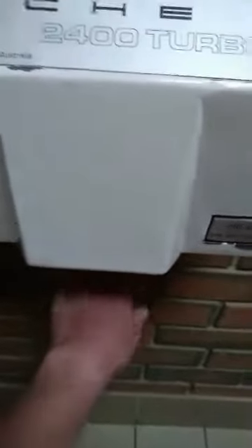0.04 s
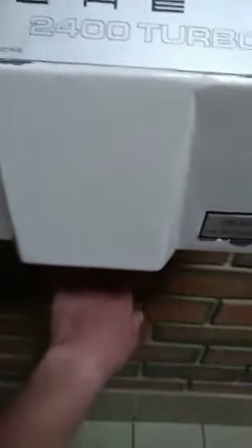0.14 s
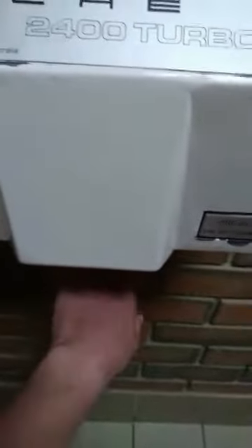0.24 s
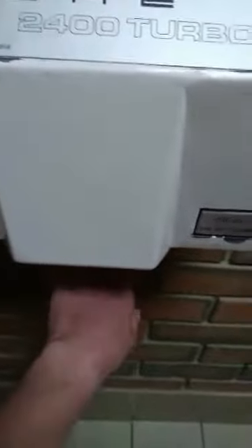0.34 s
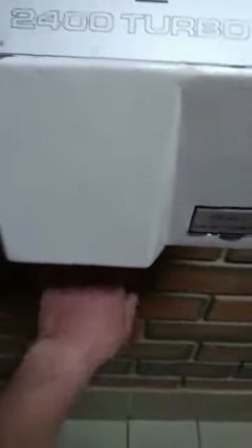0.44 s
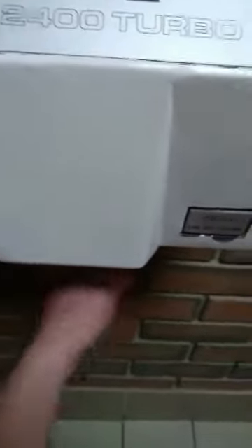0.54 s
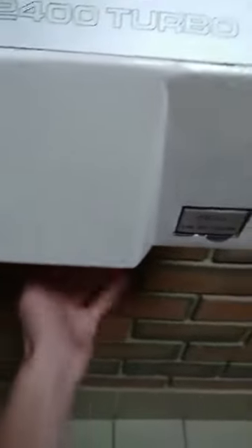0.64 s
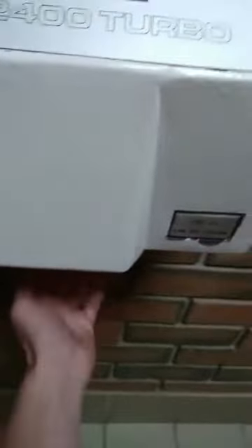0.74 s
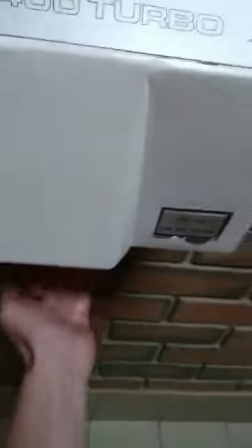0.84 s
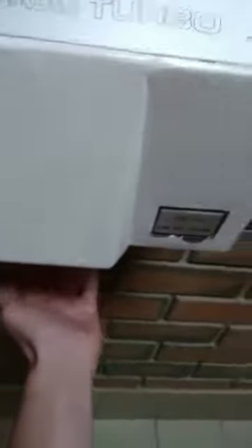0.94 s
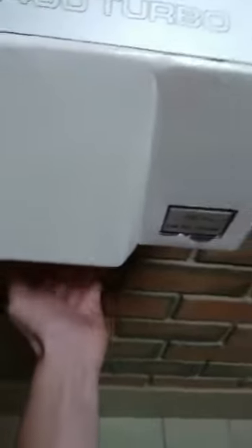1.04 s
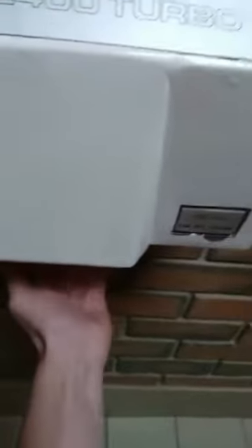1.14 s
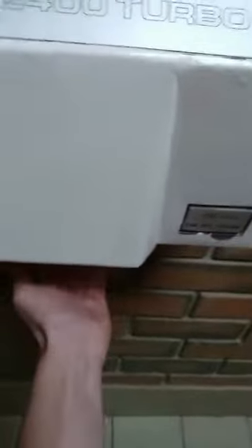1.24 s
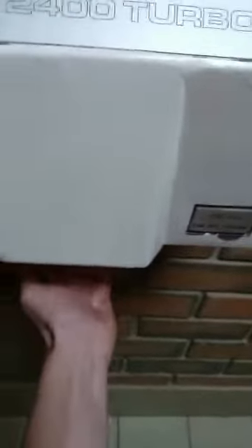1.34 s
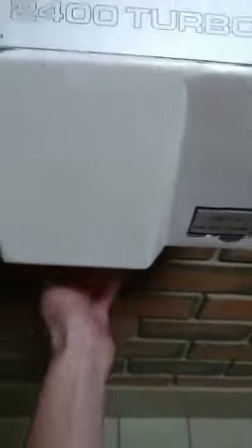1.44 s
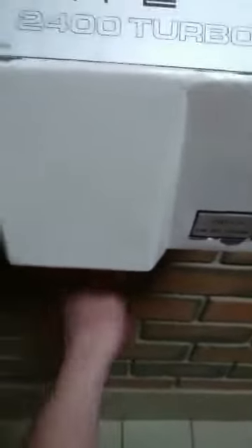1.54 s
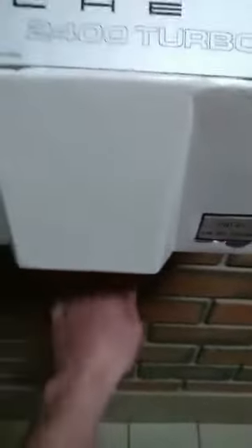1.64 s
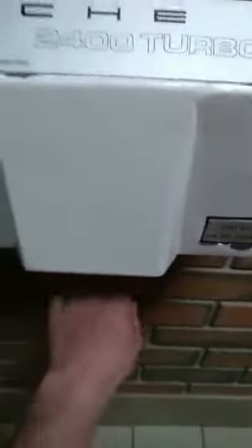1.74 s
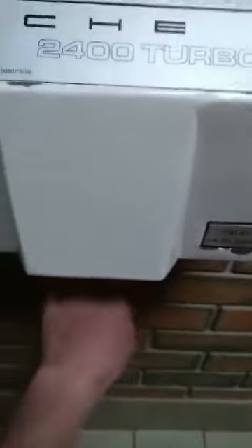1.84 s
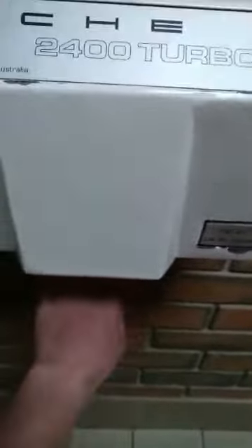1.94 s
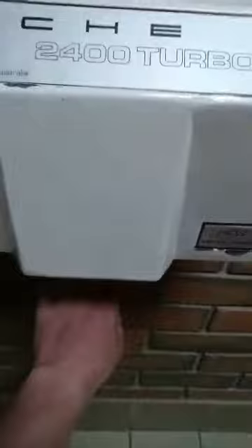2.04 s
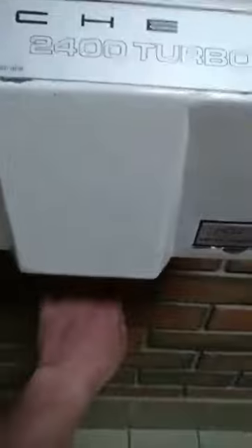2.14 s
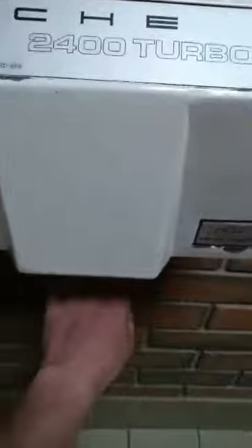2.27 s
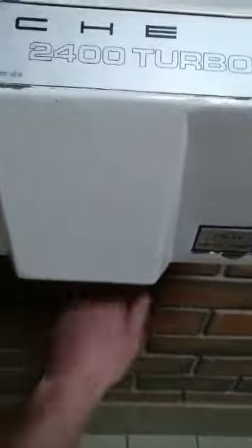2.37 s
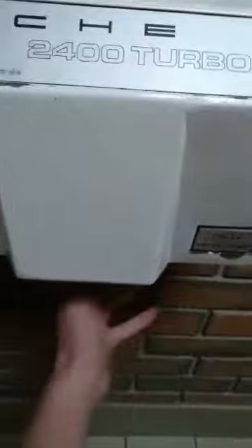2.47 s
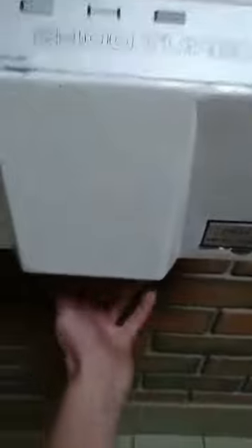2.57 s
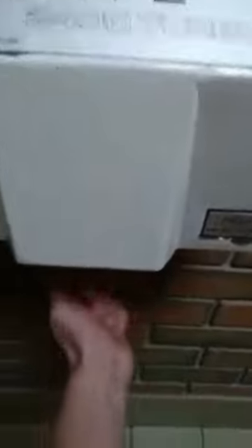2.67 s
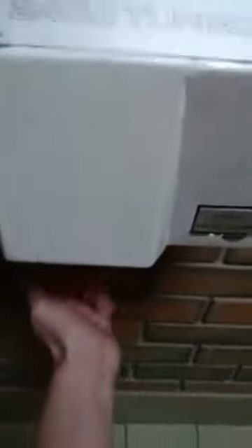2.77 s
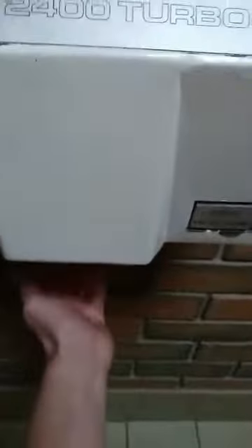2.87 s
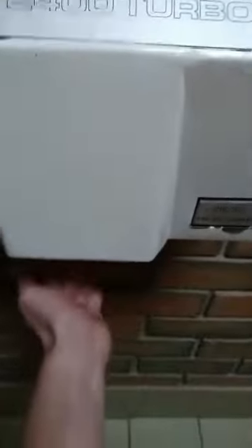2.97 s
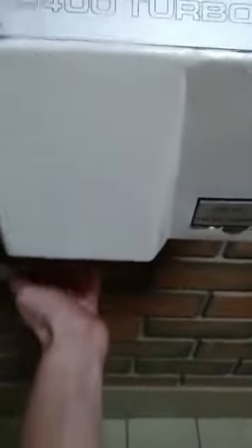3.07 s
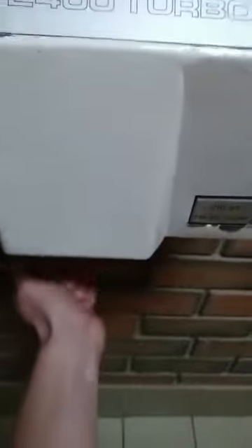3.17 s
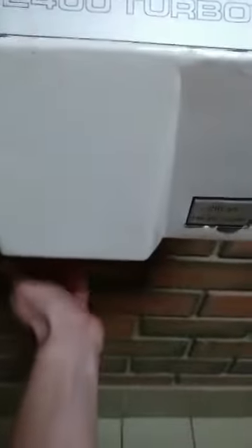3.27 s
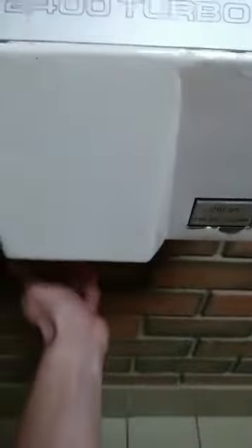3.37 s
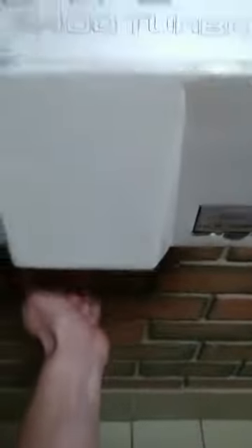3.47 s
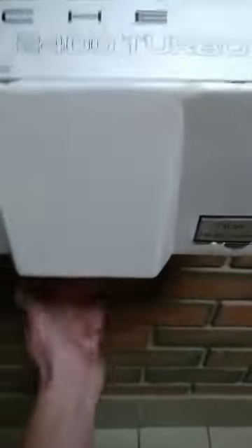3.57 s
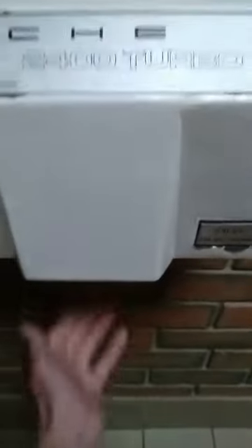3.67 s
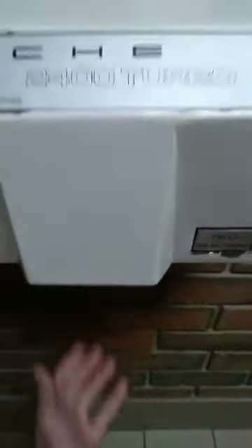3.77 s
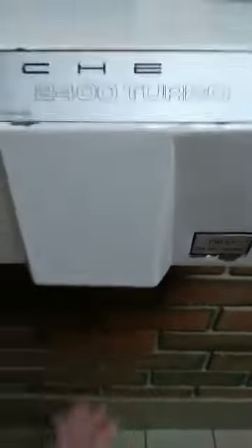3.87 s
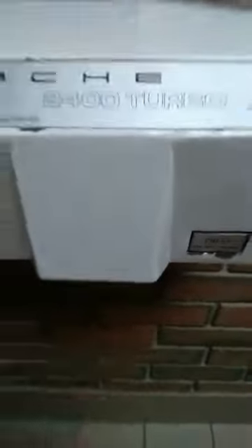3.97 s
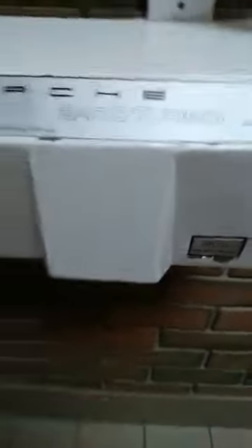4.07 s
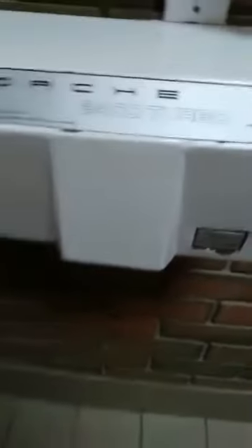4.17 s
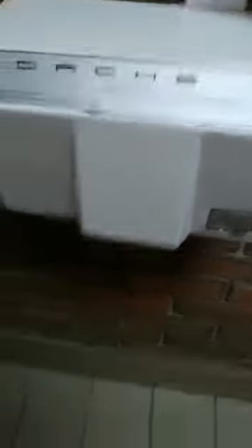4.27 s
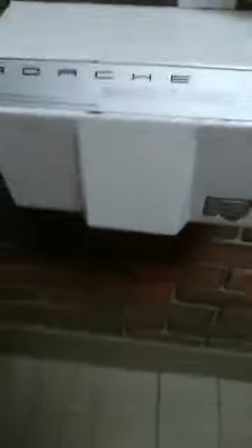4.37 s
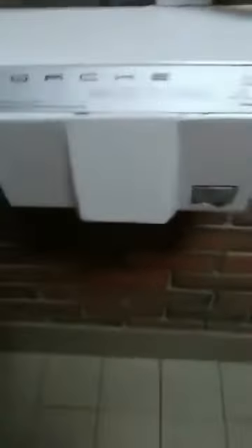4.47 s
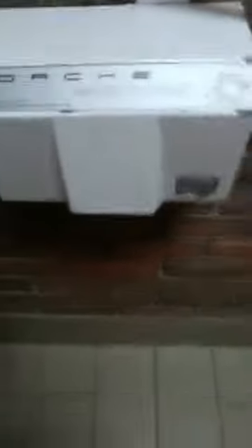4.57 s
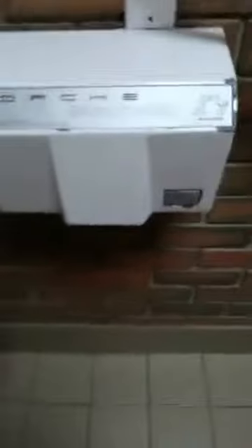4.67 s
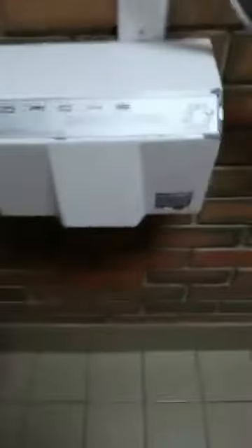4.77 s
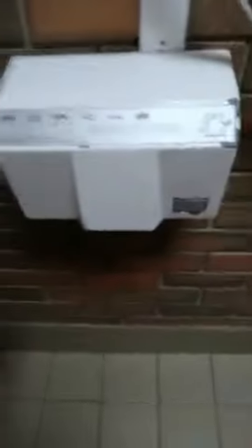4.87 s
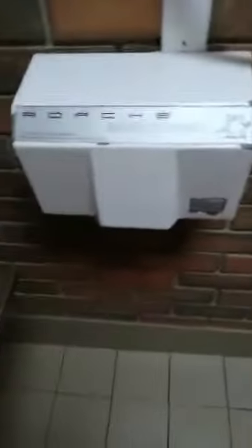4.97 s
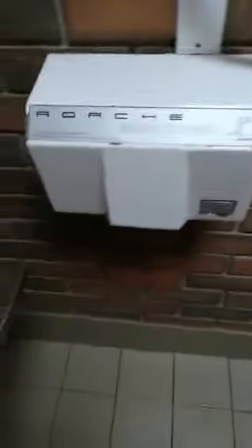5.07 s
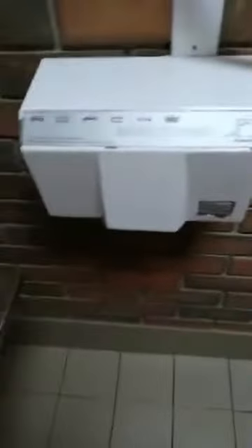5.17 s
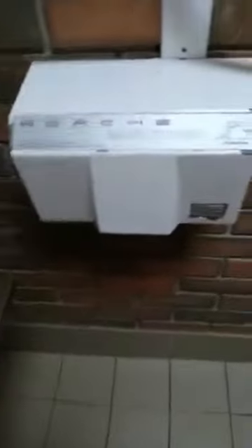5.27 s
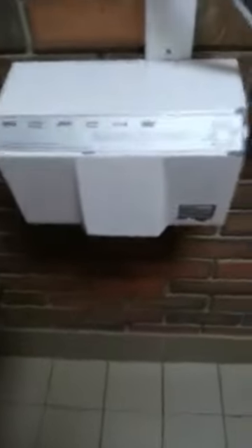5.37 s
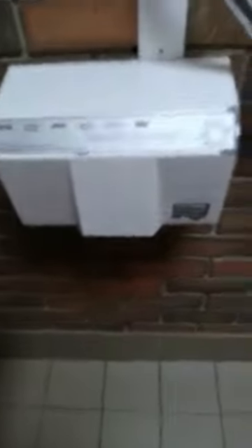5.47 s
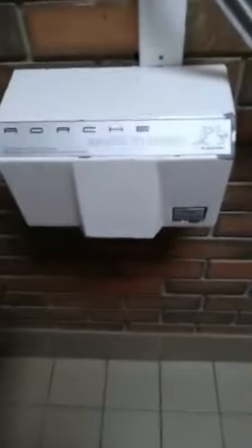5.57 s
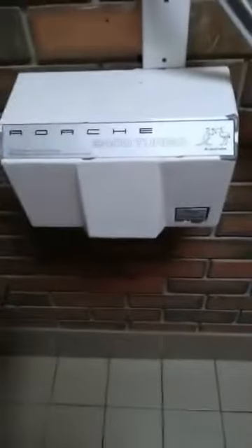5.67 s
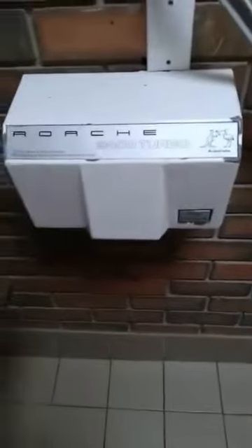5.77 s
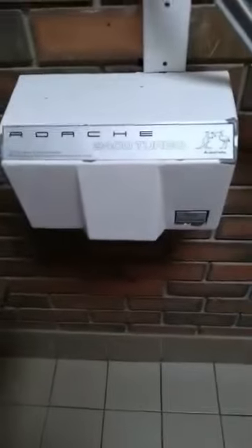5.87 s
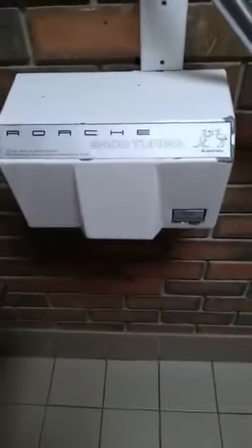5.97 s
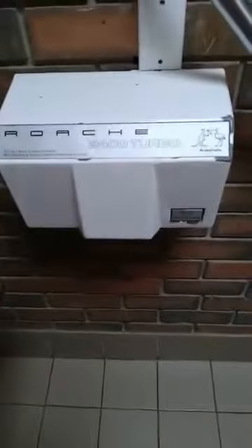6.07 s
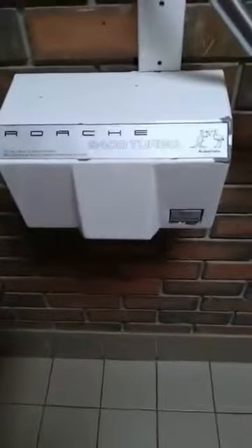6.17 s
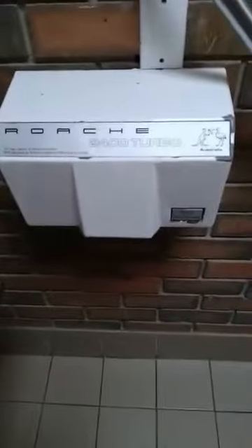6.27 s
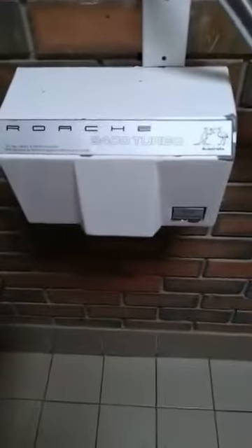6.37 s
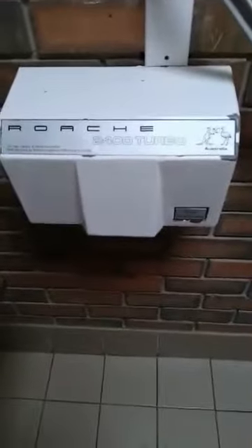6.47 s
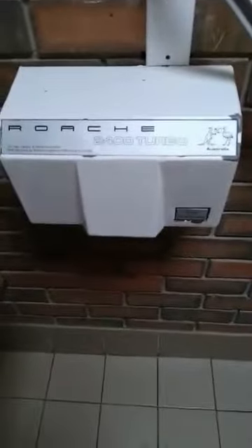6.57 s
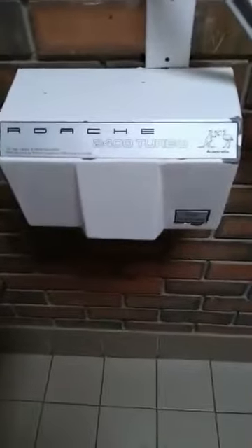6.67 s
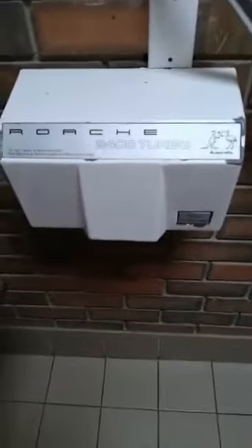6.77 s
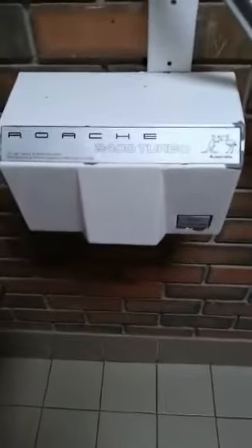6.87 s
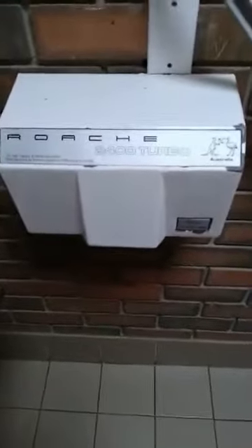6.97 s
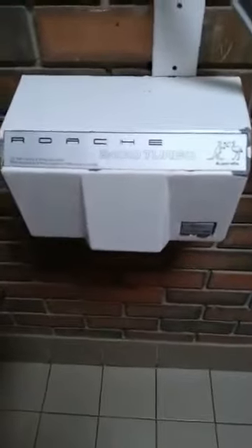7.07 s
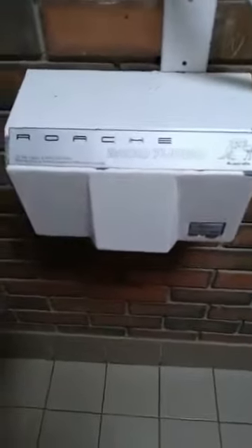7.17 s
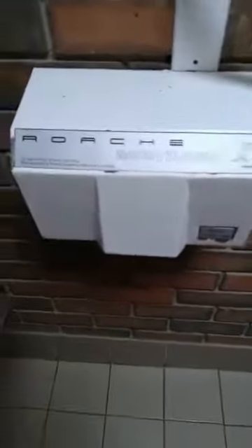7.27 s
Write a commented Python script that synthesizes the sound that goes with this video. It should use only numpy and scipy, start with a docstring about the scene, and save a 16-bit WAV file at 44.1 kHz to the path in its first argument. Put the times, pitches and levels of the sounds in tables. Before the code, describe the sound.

A wall-mounted electric hand dryer roars close up with a steady low motor drone, then clacks off and winds down to quiet.

```python
"""Hand dryer in a tiled toilet

A wall-mounted dryer heard close up: a six-blade fan, a gliding sine, drones over a rush of shaped noise.
Shaft-locked motor lines, mains hum, ringing booms and hoots thicken it; the jet hisses over a hand.
The timer clacks off in noise bursts and ringing sheet metal, and the fan coasts down in pitch and level.
A low room rumble stays, with a few soft noise scuffs, knocks and thuds."""
import sys
import numpy as np
from scipy import signal
from scipy.fft import rfft, irfft
from scipy.io import wavfile
from scipy.ndimage import uniform_filter1d

SR = 44100
rng = np.random.default_rng(int(sys.argv[2]) if len(sys.argv) > 2 else 0)


def master(y):
    """Save y as 16-bit WAV."""
    cut = np.clip(np.atleast_2d(y).T, -1, 1)
    pcm = np.round(cut * 32767)  # scale
    wavfile.write(sys.argv[1], SR, pcm.astype(np.int16))


N = 322798
TIME = np.arange(N) / SR


def gain_of(db):
    """Decibels to amplitude."""
    return 10 ** (np.asarray(db) / 20)


def evened(x):
    """Scales to rms 1."""
    return x / np.sqrt(np.mean(x ** 2) + 1e-20)


def read(points, hz):
    """Reads a spectrum table on a log-frequency axis."""
    f, value = np.transpose(points)
    return np.interp(np.log(hz + 1), np.log(f + 1), value)


def add(mix, s, sound):
    """Lays a stereo sound into the mix at time s."""
    part = mix[:, round(s * SR):][:, :sound.shape[1]]
    part += sound[:, :part.shape[1]]


def panned(db):
    """Left and right gains for a left-minus-right level difference, with mean 1."""
    pair = np.array([gain_of(db / 2), gain_of(-db / 2)])
    return pair / pair.mean(0)


def coloured(x, points):
    """Filters by a spectrum table."""
    size = x.shape[-1]
    hz = np.fft.rfftfreq(size, 1 / SR)
    return irfft(rfft(x) * gain_of(read(points, hz)), size)


def wander(hz, channels=1):
    """Slow random drift of rms 1, up to about hz."""
    f = np.fft.rfftfreq(N, 1 / SR)
    spectrum = rfft(rng.standard_normal((channels, N)))
    return evened(irfft(spectrum / (1 + (f / hz) ** 4), N))


def patches(shape, frame_count, bin_count):
    """Random blotches of rms 1 over time and frequency."""
    over_time = uniform_filter1d(rng.standard_normal(shape), frame_count, 0)
    return evened(uniform_filter1d(over_time, bin_count, 1))


def held(start, end, ramp):
    """1 between start and end, with sloping sides."""
    return np.clip(np.minimum(TIME - start, end - TIME) / ramp + .5, 0, 1)


def lifts_db(resonances, hz):
    """Summed lift of a table of resonances at hz."""
    return sum(db / (1 + (2 * (hz - f) / width) ** 2) for f, width, db in resonances)


# likeness of the two ears: f/Hz, likeness (0 to 1)
EAR_LIKENESS = [(60, 0.93), (130, 1), (270, 0.72), (570, .45), (1200, 0.066), (2500, 0.0048), (5000, 0)]
# stereo tilt: f/Hz, left minus right level/dB
NOISE_LEAN = [(60, 6), (120, -2), (240, 2.5), (400, 1.5), (1100, 0), (2000, 3), (3500, -0.5), (9000, 4.5)]


def noise(field_db, size=4096):
    """Stereo noise of rms 1 under a dB field(t, Hz); the ears share the bass but not the treble."""
    hop = size // 4
    hz = np.fft.rfftfreq(size, 1 / SR)
    t = np.arange(N // hop + 3)[:, None] * hop / SR
    shape = (2, len(t), len(hz))
    a, b = rng.standard_normal(shape) + 1j * rng.standard_normal(shape)
    same = np.clip(read(EAR_LIKENESS, hz), -1, 1)
    z = np.array([a, same * a + np.sqrt(1 - same ** 2) * b])
    z *= panned(read(NOISE_LEAN, hz))[:, None]
    z *= gain_of(field_db(t, hz))
    sound = signal.istft(z.swapaxes(1, 2), nperseg=size, noverlap=size - hop)[1]
    return evened(sound[:, :N])


# decay of the tiled room: f/Hz, t60/s
TILE_DECAY = [(200, 0.94), (2000, 0.49), (6000, 0.41), (11000, 0.3)]


def room(x):
    """Dense echoes off the tiles, the treble dying first."""
    hz, t, z = signal.stft(rng.standard_normal((2, SR)), SR, nperseg=256)
    decay = gain_of(-60 * t / read(TILE_DECAY, hz)[:, None])
    tail = signal.istft(z * decay, SR, nperseg=256)[1]
    return signal.fftconvolve(x, tail / np.linalg.norm(tail[0]), axes=1)[:, :N]


STEP_BACK = (3.65, 4.28)  # the listener backs away: start t/s, end t/s


def stepped(t, near, back):
    """Blends a value as the listener backs away from the nozzle."""
    return near + (back - near) * np.interp(t, STEP_BACK, [0, 1])


BLADES = 6
RUN_HZ, OFF_S = 284.9, 5.86  # blade-passing pitch at full speed, and the moment the power is cut
COAST_S = .37  # drag slows the fan as 1 / sqrt(1 + time / COAST_S)


def blade_hz(t):
    """Blade pitch: steady under power, then braked by drag."""
    return RUN_HZ / np.sqrt(1 + np.maximum(t - OFF_S, 0) / COAST_S)


def slowed(t):
    """Octaves of speed lost since the power was cut."""
    return np.log2(RUN_HZ / blade_hz(t))


DROP_S, DROP_FADE_S = 6.77, .08  # the sound drops away quickly here


def dropped(t):
    """0 before the late drop in level, 1 after it."""
    return np.clip((t - DROP_S) / DROP_FADE_S, 0, 1)


SLACK_SPAN = (6.32, 6.43)  # start t/s, end t/s


def slack(t):
    """0 while the jet is taut, 1 once it has gone slack."""
    return np.interp(t, SLACK_SPAN, [0, 1])


DRONE_NEAR_DB, DRONE_BACK_DB = -22, -17  # before shading, fades and flutter
# the drone drifts towards the centre as the listener turns: left minus right level/dB, t/s
LEAN_NEAR_DB, LEAN_BACK_DB, LEAN_SPAN = 10, 1.7, (3.4, 4.8)
# the palm turns up into the jet and shades the drone: start t/s, end t/s, change of level/dB
PALM_UP = [(0.603, 1.44, -4), (2.616, 3.68, -1.5)]
TURN_S, PALM_LEAN_DB = 0.89, 1.5  # ramp of each turn, and its push to the left
DRONE_FALL_DB, DRONE_DROP_DB = -12.5, -13  # per octave of speed lost, and at the late drop
UNLOAD_DB, UNLOAD_S = -18, 0.12  # the drone sinks quickly as it slides off its running pitch
DRONE_FLUTTER_DB, COAST_FLUTTER_DB = .42, 1.3  # rms, throughout and added while coasting
DRIFT_HZ = .08  # rms wander of the pitch
# the second harmonic sings out as it slides through the hollow near 400 Hz: level/dB before fades, t/s
OCTAVE_DB, OCTAVE_SPAN = -44, (6.12, 6.45)
STEP_M, SOUND_M_PER_S = .38, 343  # length of the step back, and the speed of sound
# standing waves that the falling tone sweeps through: f/Hz, width/Hz, lift/dB
STANDING_WAVES = [(282.5, 18, 43), (246, 23, 5), (200.3, 8.6, 11.5), (183.5, 8.5, 8.5), (158, 12, 4.5)]


def fan():
    """Blade tone shaded by the hand; sliding down, it flutters and swells through the standing waves."""
    hz = blade_hz(TIME)
    turns = np.cumsum(hz + DRIFT_HZ * wander(2.1)[0]) / SR
    turns = turns - stepped(TIME, 0, STEP_M) * RUN_HZ / SOUND_M_PER_S  # the longer path delays the tone
    turns = turns - np.interp(OFF_S, TIME, turns)  # counted from the moment the power is cut
    level_db = stepped(TIME, DRONE_NEAR_DB, DRONE_BACK_DB)
    lean_db = np.interp(TIME, LEAN_SPAN, [LEAN_NEAR_DB, LEAN_BACK_DB])
    for start, end, shade_db in PALM_UP:
        palm = held(start, end, TURN_S)
        level_db = level_db + shade_db * palm
        lean_db = lean_db + PALM_LEAN_DB * palm
    coasting = 1 - np.exp(-np.maximum(TIME - OFF_S, 0) / UNLOAD_S)
    fade_db = DRONE_FALL_DB * slowed(TIME) + DRONE_DROP_DB * dropped(TIME)
    sweep_db = coasting * (UNLOAD_DB + lifts_db(STANDING_WAVES, hz))
    flutter_db = DRONE_FLUTTER_DB * wander(26.0)[0] + COAST_FLUTTER_DB * coasting * wander(25)[0]
    tone_gain = np.sqrt(2) * gain_of(level_db + fade_db + sweep_db + flutter_db)
    tone = tone_gain * np.sin(2 * np.pi * turns)
    octave_gain = gain_of(OCTAVE_DB + fade_db) * held(*OCTAVE_SPAN, ramp=0.086)
    octave = octave_gain * np.sin(4 * np.pi * turns)
    return (tone + octave) * panned(lean_db)


# rush of air near the nozzle and a step back: f/Hz, relative level/dB per Hz
RUSH_NEAR = [(30, -9.5), (65, 0), (110, 1.5), (190, 8), (300, 9), (400, 1), (520, -1.5), (720, -0.5),
             (950, -6.5), (1300, -9), (1700, -9.5), (2200, -11.5), (3500, -18), (4700, -24), (6500, -34.5),
             (11000, -51)]
RUSH_BACK = [(30, -11), (70, -5), (110, -7), (190, 13), (300, 8.5), (400, 4.5), (520, -3), (720, 0.5),
             (950, -8), (1700, -10.5), (2200, -11), (3500, -15), (4700, -24), (6500, -34.5), (11000, -48.5)]
# resonances and notches of housing and room that colour the air: f/Hz, width/Hz, lift/dB
HOLLOWS = [(92, 45, 6), (116, 9.1, -6), (130.6, 10, 5.5), (158.7, 7.9, 6), (244.2, 14, 8.5), (262, 19, 8.5),
           (348.7, 13, 5), (400, 36, 5.5), (527, 42, -2), (687, 25, 3.5), (1130, 30, -3.5),
           (1278, 170, 8.5), (1510, 81, 6), (1700, 160, -2), (1940, 420, 3.5), (2290, 140, 3),
           (3630, 240, -5.5), (4200, 380, 0.5)]
# change of the rush as the fan slows: f/Hz, level/dB per octave of speed lost
RUSH_FALL = [(100, -15), (260, -15.5), (450, -15), (750, -16.5), (1500, -18), (4000, -24)]
RUSH_DROP_DB = -13.5  # at the late drop


def rush_db(t, hz):
    """Turbulence through the housing; a slowing fan loses its treble first."""
    # 1.9 dB trims the whole step-back colour
    shape_db = stepped(t, read(RUSH_NEAR, hz), read(RUSH_BACK, hz) - 1.9) + lifts_db(HOLLOWS, hz)
    flow_db = read(RUSH_FALL, hz) * slowed(t) + RUSH_DROP_DB * dropped(t)
    # above 1 kHz the rush drops 9 dB per octave once the jet goes slack
    slack_db = -9 * slack(t) * np.maximum(np.log2((hz + 1) / 1000), 0)
    # reflections off hand and walls shift as things move, and ripple the colour
    ripple_db = 2.3 * patches(shape_db.shape, frame_count=14, bin_count=7) * np.minimum(hz / 900, 1)
    eddies_db = stepped(t, 0.68, 0.4) * patches(shape_db.shape, frame_count=4, bin_count=24)
    return shape_db + flow_db + slack_db + ripple_db + eddies_db


# the walls throw the rush back and comb it: delay/s, strength before colouring
ECHOES = [(.0318, .38), (.0378, .17)]
# dulling of those echoes: f/Hz, level/dB
ECHO_COLOUR = [(700, -0.5), (1600, -7), (4000, -15)]


def walls(x):
    """Adds the dull first echoes off the walls."""
    dull = coloured(x, ECHO_COLOUR)
    return x + sum(strength * np.roll(dull, round(s * SR), axis=1) for s, strength in ECHOES)


def air():
    """The rush of air between the walls, fluttering slightly."""
    return gain_of(-33.5) * evened(walls(noise(rush_db))) * gain_of(.5 * wander(15))


# motor and bearing lines: multiple of shaft speed, relative level/dB near the nozzle and a step back
SHAFT_LINES = [(1, -52, -53), (2, -53, -52), (7, -62, -50), (8.44, -50, -56), (9.88, -55, -66),
               (12, -58.5, -49.5), (13.3, -58.5, -49.5), (15, -50.5, -52.5), (17.02, -56.5, -56.5),
               (18, -61, -53), (22, -63, -72), (26.62, -69, -64), (31.67, -65, -63), (40.15, -73, -69)]
LINE_WAVER = .2  # share of each of two level wavers, one common to both ears


def motor():
    """Wavering lines tied to the shaft, fading quickly as it slows."""
    turns = np.cumsum(blade_hz(TIME) + .25 * wander(2.5)[0]) / SR / BLADES
    out = np.zeros((2, N))
    for order, near_db, back_db in SHAFT_LINES:
        # higher lines reach the ears further out of step
        apart = rng.uniform(-0.55, 1, (2, 1)) * min(order / 18, 1.5)
        waver = 1 + LINE_WAVER * (wander(6.4) + wander(6.9, channels=2))
        line = np.sin(2 * np.pi * order * turns + apart) * waver
        out += gain_of(stepped(TIME, near_db, back_db)) * line
    return out * gain_of(-0.5 - 36 * slowed(TIME) + RUSH_DROP_DB * dropped(TIME))


def mains():
    """Windings hum at twice the mains frequency, beating with the shaft, until the contacts open."""
    hum = np.sin(2 * np.pi * (100 * TIME + rng.random()))
    return gain_of(-48) * hum * np.clip(1 - (TIME - OFF_S) / 0.053, 0, 1)


# air booms in narrow standing waves: f/Hz, width/Hz, relative level/dB near the nozzle and a step back
BOOMS = [(218.7, 6, -41.5, -52.5), (240.5, 13, -38, -44), (261, 5.2, -37.5, -43.5)]


def booms():
    """Turbulence keeps a few room modes ringing; they beat with the drone, out of step at the ears."""
    out = np.zeros((2, N))
    for hz, width_hz, near_db, back_db in BOOMS:
        a, b = wander(width_hz / 2, channels=2)
        turn = 2 * np.pi * hz * TIME + np.array([[0], [1]]) * 0.33  # right ear leads by 0.33 rad
        out += gain_of(stepped(TIME, near_db, back_db)) * (a * np.cos(turn) + b * np.sin(turn))
    return out * gain_of(-25 * slowed(TIME)) * panned(stepped(TIME, 7.5, 3.1))


# gusts off the hand set one hollow hooting: middle t/s, length/s, f/Hz, peak level/dB before panning
GUSTS = [(0.29, 0.4, 402, -38), (.55, 0.16, 258, -31.5), (0.895, 0.48, 220, -32), (1.102, 0.24, 259.6, -30),
         (1.45, 0.16, 398, -42), (1.47, 0.47, 254.3, -32), (1.673, .35, 225, -29.5),
         (1.922, 0.13, 403.7, -35.5), (2.454, 0.23, 260.3, -37), (2.782, .3, 257.2, -26.5),
         (2.956, 0.27, 222, -32), (2.97, 0.31, 242.2, -31.5), (3.104, 0.16, 394, -43),
         (3.522, .2, 402, -38), (3.585, 0.39, 260, -26), (4.148, 0.26, 262.2, -27),
         (5.324, 0.28, 244, -35.5), (5.619, 0.22, 244, -34.5), (5.998, .13, 240, -27)]


def gusts():
    """Short hoots, wavering in pitch, that swell out of the rush."""
    out = np.zeros((2, N))
    for s, length, hz, db in GUSTS:
        swell = np.cos(np.pi * np.clip((TIME - s) / length, -.5, .5)) ** 2
        turns = np.cumsum(hz + 3 * wander(15)[0]) / SR
        out += gain_of(db) * swell * np.sin(2 * np.pi * turns)
    return out * panned(3.0)[:, None]


# colour of the fine hiss: f/Hz, relative level/dB per Hz
SPRAY_COLOUR = [(2000, -20.5), (4500, -7), (7000, -1), (9000, 2.5), (10200, -4.5), (11200, -17.5),
                (13000, -30)]
# the hiss flares: start t/s, end t/s, lift/dB
FLARES = [(0.602, 1.1, 3.5), (2.46, 2.563, 2.5), (5.348, 5.812, 4)]
FLARE_S = .08  # ramp of each flare
# hiss of the jet on skin and nozzle, and its change per octave of speed lost
SPRAY_NEAR_DB, SPRAY_BACK_DB, SPRAY_FALL_DB = -69.5, -71.5, -24


def spray():
    """Fine hiss with a spatter of droplets; it flares now and then and dies with the fan."""
    # about 300 droplets a second in each ear
    spatter = rng.standard_normal((2, N)) * (rng.random((2, N)) < 300 / SR)
    hiss = evened(coloured(rng.standard_normal((2, N)) + .4 * evened(spatter), SPRAY_COLOUR))
    flares_db = sum(db * held(start, end, FLARE_S) for start, end, db in FLARES)
    level_db = stepped(TIME, SPRAY_NEAR_DB, SPRAY_BACK_DB) + flares_db
    level_db = level_db + SPRAY_FALL_DB * slowed(TIME) - 12 * slack(TIME)
    return gain_of(level_db + .6 * wander(10)) * hiss * panned(2.0)[:, None]


def snap(colour, decay_s):
    """A short burst of coloured noise that dies away."""
    t = TIME[:SR // 2]
    return evened(coloured(rng.standard_normal((2, len(t))), colour)) * np.exp(-t / decay_s)


# timer contacts: t/s, relative level/dB, ring of the housing as level/dB against the contact
CLACKS = [(5.667, -45, -13), (5.671, -43.5, -15.5), (5.859, -40.5, -6), (5.863, -39, -2.5),
          (5.872, -47, -5), (5.887, -52, 1.5)]
# colour of a contact: f/Hz, relative level/dB per Hz
CLACK_COLOUR = [(300, -4), (1500, 0.5), (2500, 7.5), (4500, 0), (7000, -1.5), (9500, -2), (11000, -12),
                (12500, -20.5)]
# modes of the housing: f/Hz, relative level/dB, t60/s
HOUSING_MODES = [(572, 0, .3), (675, 2, .25), (1335, -3, .25), (1900, 9, .26), (1946, 4, .18),
                 (2010, 0, .12), (2130, -2, .12), (2256, -4, .2), (2541, 0, .17), (3467, -8, .2)]
# faint ticks, perhaps drops blown off the hand: t/s, relative level/dB
DROPS = [(.169, -56.5), (.292, -54.5), (2.491, -63.5), (3.443, -65), (3.74, -59.5), (4.219, -57),
         (4.496, -60)]
HOUSING_DB = -2  # trim of the whole ring


def clicks():
    """Timer contacts snap into the room and the sheet-metal housing rings up and dies; drops tick."""
    out, ring = np.zeros((2, N)), np.zeros((2, N))
    t = TIME[:SR // 2]
    swell = 1 - np.exp(-t / .012)
    for s, db, ring_db in CLACKS:
        modes = np.zeros((2, len(t)))
        for hz, mode_db, t60 in HOUSING_MODES:
            mode = np.sin(2 * np.pi * (hz * t + rng.random((2, 1))))
            modes += gain_of(mode_db - 60 * t / t60) * mode
        add(out, s, gain_of(db) * snap(CLACK_COLOUR, decay_s=0.0066))
        add(ring, s, gain_of(db + ring_db) * swell * modes)
    for s, db in DROPS:
        add(out, s, gain_of(db) * snap(SPRAY_COLOUR, decay_s=.005))
    rattle = 1 + .45 * wander(70, channels=2)
    mix = gain_of(-2.5) * out + gain_of(-1.5) * room(out) + gain_of(HOUSING_DB) * ring * rattle
    return mix * panned(3.1)[:, None]


# low thuds, the first as the motor loses its drive: t/s, f/Hz, relative level/dB, rise/s, t60/s
THUDS = [(5.8956, 242.1, -9.5, 0.052, 0.27), (6.969, 282, -37.5, 0.06, 0.47),
         (7.125, 125, -40.5, .04, 0.64)]


def thuds():
    """Soft knocks that swell into one low mode and ring out."""
    out, t = np.zeros((2, N)), TIME[:SR]
    for s, hz, db, rise_s, t60 in THUDS:
        rise = np.sin(np.pi / 2 * np.minimum(t / rise_s, 1)) ** 2
        ring = rise * gain_of(db - 60 * t / t60) * np.sin(2 * np.pi * hz * t)
        add(out, s, ring * panned(1.0)[:, None])
    return out


# soft scuffs: t/s, length/s, level/dB before fades and room
SCUFFS = [(6.809, 0.13, -56.5), (7.184, 0.053, -58)]
# colour of a scuff: f/Hz, relative level/dB per Hz
SCUFF_COLOUR = [(100, 12), (350, 8), (700, 8), (1000, -2), (1350, 3), (2100, -16), (2700, -22), (6000, -41)]


def scuffs():
    """Dull, brief rubs of noise heard from the late drop in level on."""
    out = np.zeros((2, N))
    for s, length, db in SCUFFS:
        rub = evened(coloured(rng.standard_normal((2, SR // 2)), SCUFF_COLOUR))[:, :int(length * SR)]
        add(out, s, gain_of(db) * rub * signal.windows.tukey(rub.shape[1], .6))
    return out + gain_of(-16) * room(out)


# small dull knocks near the end: t/s, relative level/dB, decay to 1/e before colouring/s
KNOCKS = [(6.817, -53, .007), (6.883, -50, .008), (6.982, -61, 0.0066), (7.047, -55, 0.0046),
          (7.183, -46, 0.0087), (7.196, -46.5, 0.0081), (7.212, -50, .007), (7.227, -46.5, .005)]
# colour of a knock: f/Hz, relative level/dB per Hz
KNOCK_COLOUR = [(150, -2), (450, 1), (650, 6), (1000, -4), (1400, -11), (2150, -12), (2600, -30),
                (6000, -52)]


def knocks():
    """Light taps, dulled by what they strike, with a little room behind them."""
    out, t = np.zeros((2, N)), TIME[:SR // 2]
    for s, db, decay_s in KNOCKS:
        tap = rng.standard_normal((2, len(t))) * np.exp(-t / decay_s)
        add(out, s, gain_of(db) * (0.52 * tap + 0.22 * tap[::-1]))  # each ear hears some of the other
    out = gain_of(9.0) * coloured(out, KNOCK_COLOUR)
    return out + gain_of(-11) * room(out)


# the quiet room: f/Hz, relative level/dB per Hz
STILL_ROOM = [(10, -2), (35, -1.5), (60, -9), (90, 1), (140, 0), (200, -5), (270, 5), (340, -8.5),
              (520, -22.5), (680, -16.5), (1000, -38), (2500, -52), (5000, -58), (12000, -64)]


def background():
    """The still room as shaped noise, and a deep rumble wavering gently about 25.9 Hz."""
    turns = np.cumsum(25.9 + .4 * wander(3)[0]) / SR
    rumble = np.sin(2 * np.pi * turns) * gain_of(0.9 * wander(5))
    still = noise(lambda t, hz: read(STILL_ROOM, hz))
    return gain_of(-47.0) * still + gain_of(-40.5) * rumble


def scene():
    """Dryer, hand and room together."""
    dryer = fan() + air() + motor() + mains() + booms()
    jet = gusts() + spray()
    return dryer + jet + clicks() + thuds() + scuffs() + knocks() + background()


EDGE_HZ = 11870  # top of the band


def record(dry):
    """Soft ends, then a steep low-pass that closes off the top."""
    ends = np.sin(np.pi / 2 * np.minimum(np.minimum(TIME, TIME[::-1]) / .006, 1)) ** 2
    low_pass = signal.firwin(511, EDGE_HZ, window=("kaiser", 9), fs=SR)
    return signal.oaconvolve(dry * ends, low_pass[None], "same")


dry = scene()
out = record(dry)
master(out)
```